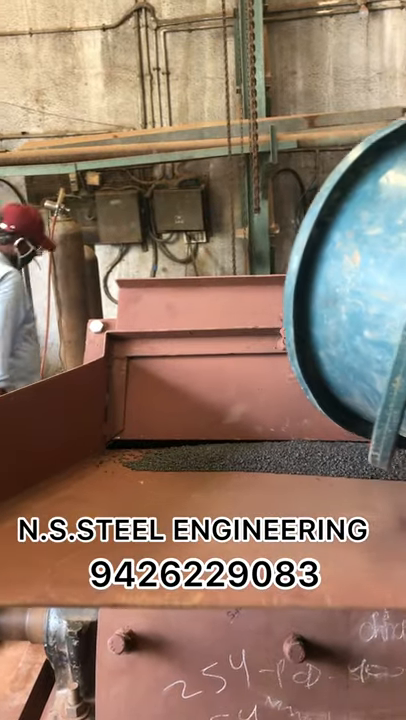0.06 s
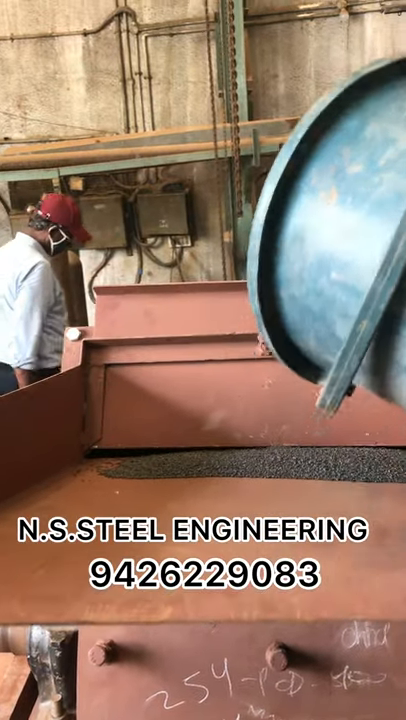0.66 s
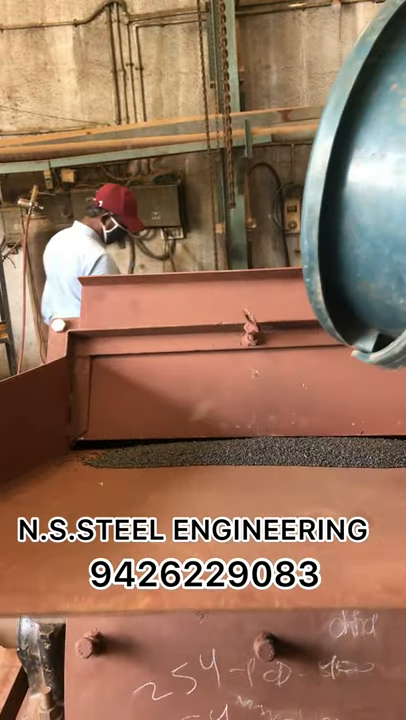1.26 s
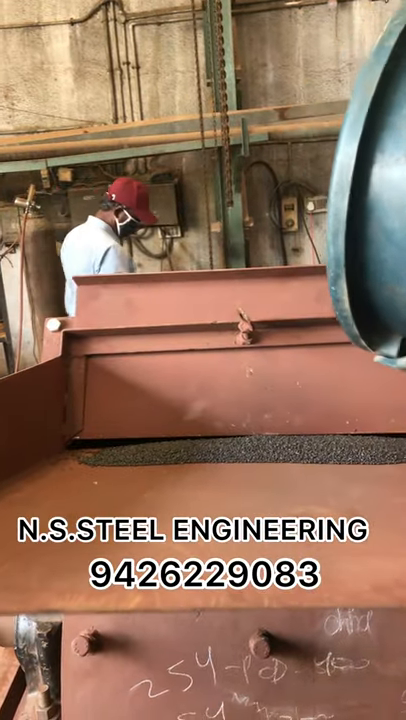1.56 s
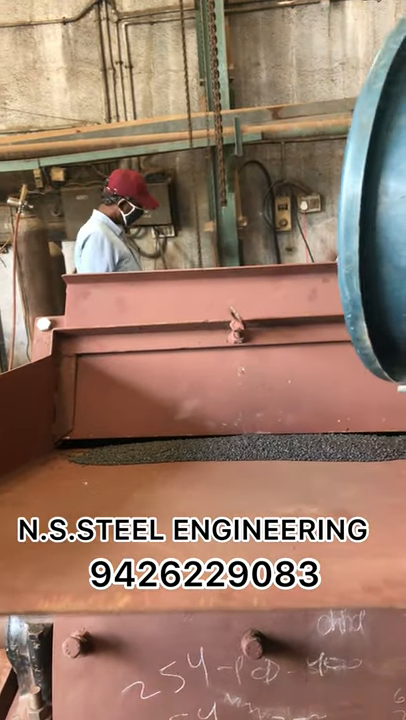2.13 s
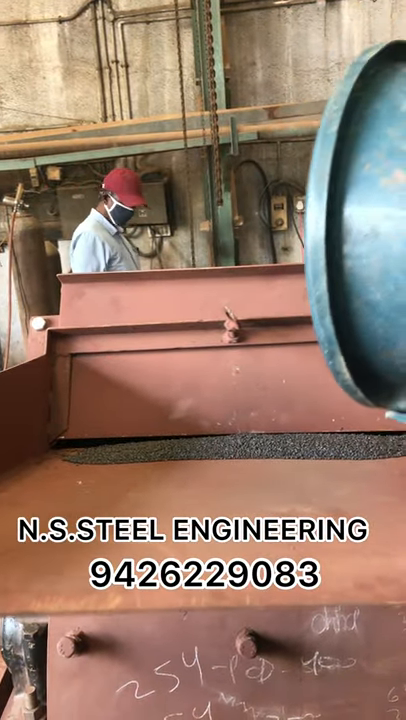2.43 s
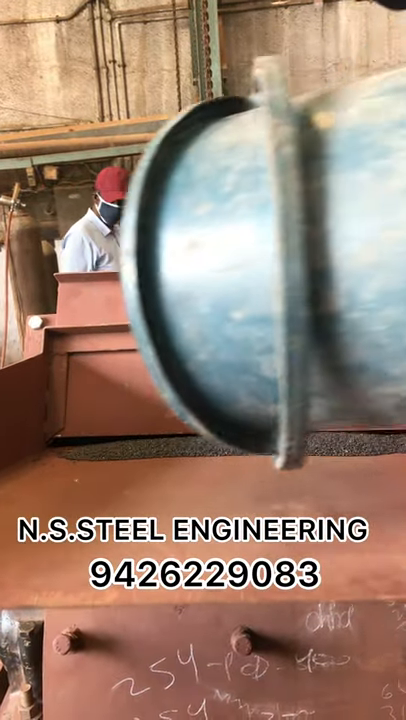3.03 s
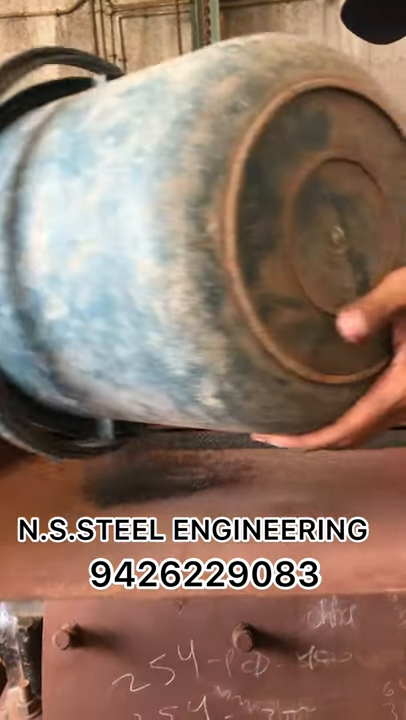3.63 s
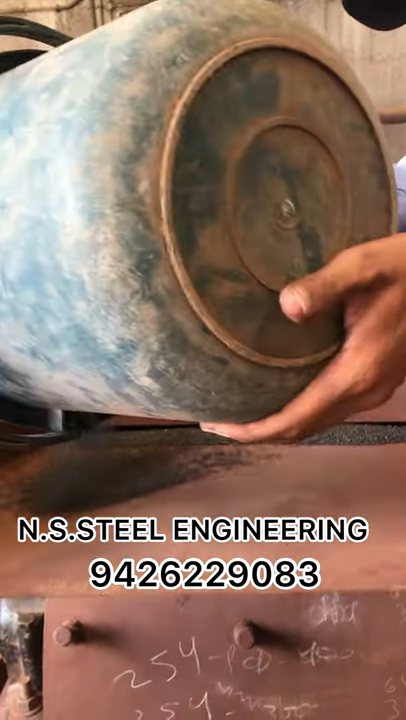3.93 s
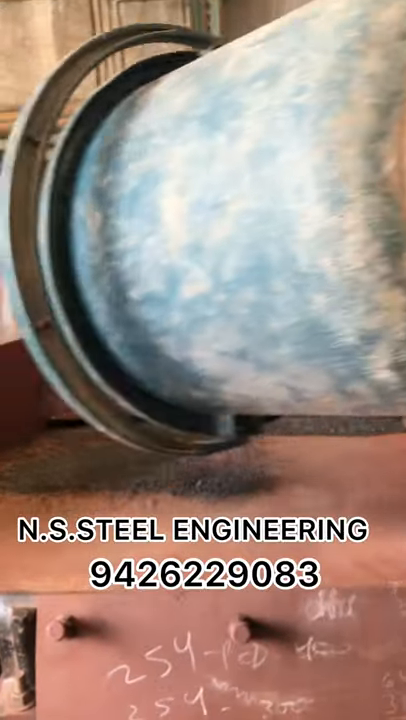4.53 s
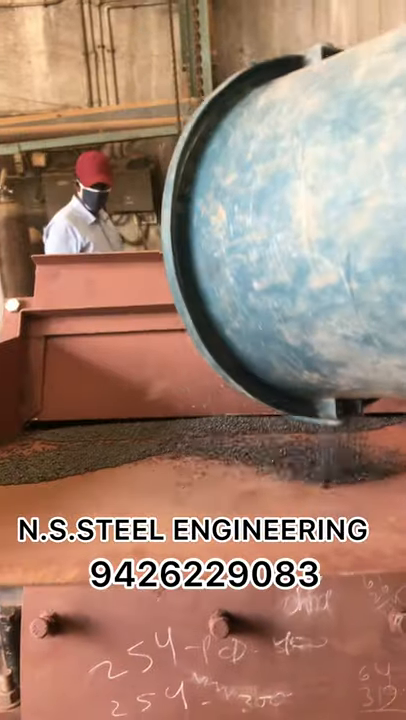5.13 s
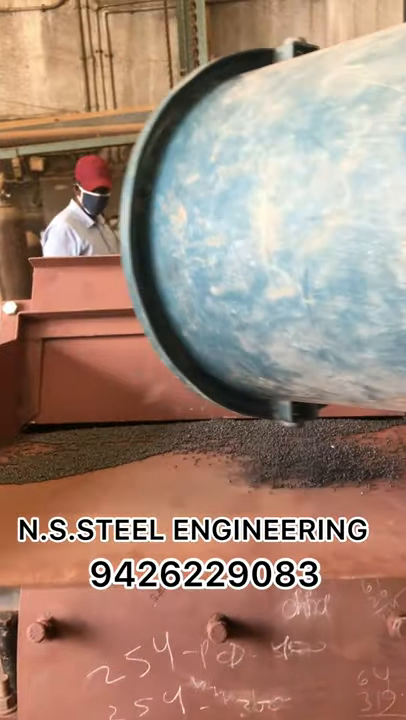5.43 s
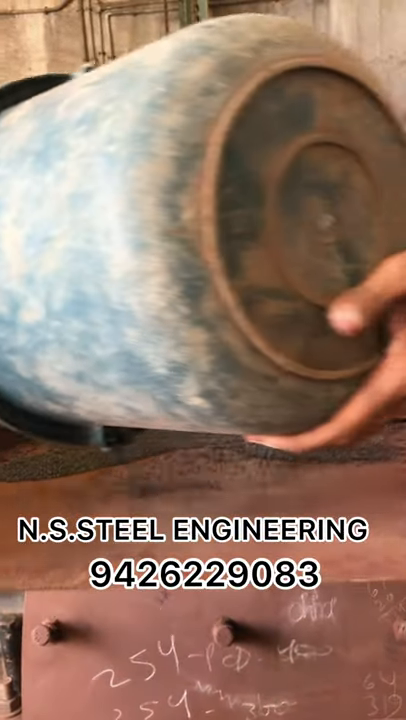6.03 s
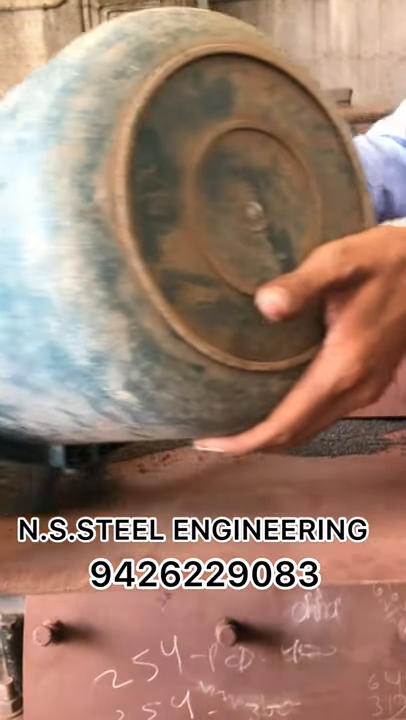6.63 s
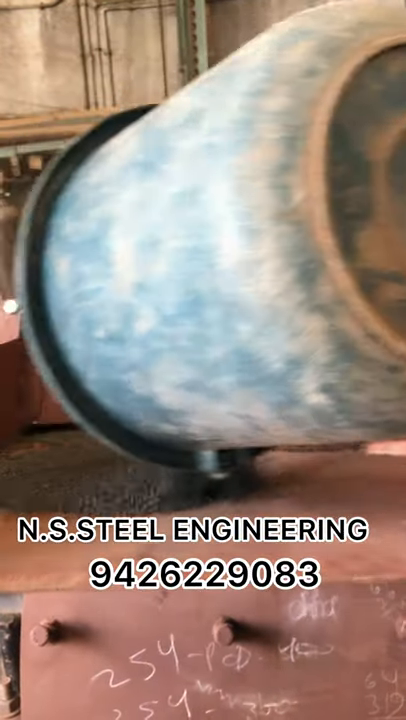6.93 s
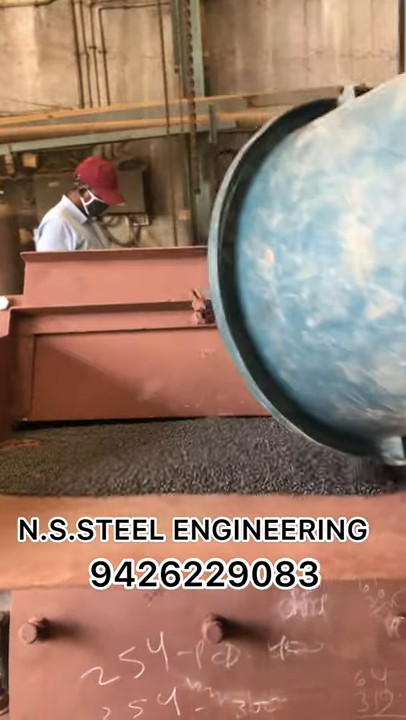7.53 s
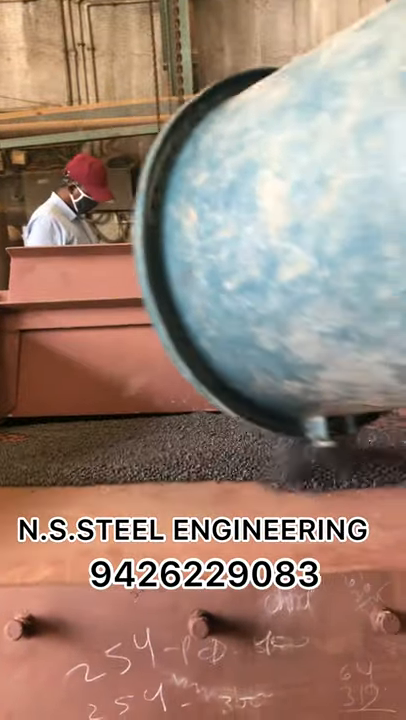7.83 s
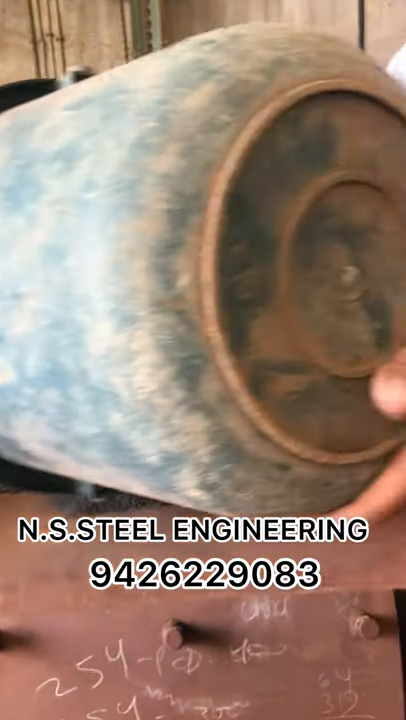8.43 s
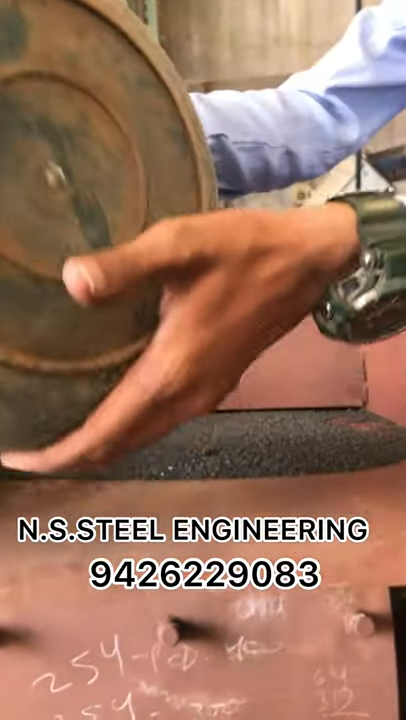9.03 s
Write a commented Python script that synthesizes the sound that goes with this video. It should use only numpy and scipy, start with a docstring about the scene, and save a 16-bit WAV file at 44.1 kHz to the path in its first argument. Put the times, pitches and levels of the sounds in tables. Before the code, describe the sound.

A crushing machine runs steadily in a workshop shed, with a loud hum, a thin high whine and a rush of churned air. After about three seconds, grit is shaken from a bucket onto the steel feed tray in several slides, adding a brighter hiss, fine patter and a few sharp ticks. The whine softens as the bucket comes in front of the fixed microphone.

```python
"""Hammer crusher in a workshop shed

A bucket of grit is shaken out over the feed tray of a running crusher. The hammers chop the air six
times a turn into a loud hum and a thin whine; the frame drones, churned air roars, and grit hisses
and ticks on the steel. The bucket swings in front of the microphone, screening the whine and shifting
the standing waves of the hum. The machine sits dead centre, the same in both channels."""
import sys
import numpy as np
from scipy import signal
from scipy.fft import rfft, irfft, next_fast_len
from scipy.io import wavfile

SR = 44100
rng = np.random.default_rng(int(sys.argv[2]) if len(sys.argv) > 2 else 0)


def master(y):
    """Save y as 16-bit WAV."""
    cut = np.clip(np.atleast_2d(y).T, -1, 1)
    pcm = np.round(cut * 32767)  # scale
    wavfile.write(sys.argv[1], SR, pcm.astype(np.int16))


N = 408807
TIME = np.arange(N) / SR
HAMMERS = 6

# weak drones of motor, belts and frame: f/Hz, relative level/dB
FRAME_DRONES = [(49.7, -64), (52.7, -70), (62.5, -55), (87.3, -55), (99.6, -54), (107.6, -52.5),
                (125, -54.5), (134.8, -47), (144.6, -56), (162.2, -52), (175, -47), (196, -60),
                (216.6, -53), (249.8, -47), (266, -66), (308.5, -46.5), (367, -53.5), (382.6, -52.5)]
# air churned in the casing: f/Hz, relative density/(dB per Hz)
AIR_SPECTRUM = [(28, -97), (36, -90), (44, -73), (80, -69.5), (135, -61.5), (175, -66.5), (235, -55.5),
                (310, -63), (410, -65), (490, -65), (620, -62), (850, -64.5), (1090, -67), (1450, -71),
                (2200, -78.5), (5000, -100)]
# grit scouring the steel: f/Hz, relative density/(dB per Hz)
GRIT_SPECTRUM = [(900, -91.5), (1600, -69), (1870, -64.5), (2250, -69), (3000, -68), (3650, -66),
                 (4850, -66), (5400, -64.5), (6300, -64.5), (7100, -65.5), (7600, -69), (8600, -66.5),
                 (10000, -68), (10500, -69.4), (11500, -64.5), (15700, -69.5)]
# resonances of the steel casing: f/Hz, width/Hz, lift/dB
CASING_MODES = [(525, 13, 1), (1065, 76, 4), (1310, 43, 6), (2110, 80, 1), (2910, 100, 4), (3635, 45, 2),
                (5180, 27, 2.5), (5520, 78, 1.5), (6110, 97, 4.5), (11800, 400, 0.5)]
# single grains and clumps striking steel: t/s, level/dB, centre f/Hz, decay/ms
GRIT_STRIKES = [(1.018, -18, 5200, 2), (5.327, -23, 11000, 7), (6.283, -25, 8000, 12),
                (6.318, -24, 11000, 9.7), (6.535, -24, 10000, 10), (7.257, -23, 12500, 10),
                (8.4386, -10.5, 15000, 0.8), (8.4513, -18, 6500, 1.5)]
# slides of grit out of the bucket: t/s, length/s, flow/(0-1)
GRIT_SLIDES = [(3.35, 1.5, 1), (4.853, 1.5, .62), (6.146, 0.93, 0.7), (8.854, .5, .8)]
# shoves of the bucket across the tray and back: t/s, length/s, reach/(0-1)
BUCKET_SHOVES = [(3.4, 1.27, 0.46), (5.7, 1.55, 0.55), (7.92, 1.85, 0.96)]
# tones locked to the rotor: order/(cycles a turn), relative level/dB
ROTOR_ORDERS = [(1, -48.5), (2, -47), (3, -42), (4, -51), (5, -40.5), (6, -15.5), (7, -35.5), (8, -48),
                (9, -46.5), (10, -55.5), (12, -30.5), (14, -61), (15, -45), (16, -49), (18, -22.2),
                (20, -59), (21, -46.5), (24, -32), (26, -50), (27, -46.5), (28, -54), (30, -26), (33, -46),
                (34, -55), (36, -41.5), (39, -55.5), (42, -49), (48, -44), (51, -50), (54, -46), (60, -53),
                (63, -54.5), (66, -53.5), (126, -56), (132, -44.5), (135, -53), (138, -39), (144, -62)]
# change at the microphone, a row for each hammer harmonic from the first up:
# bucket aside/dB, at full reach/dB, rim passing/dB
STANDING_WAVES = [(-0.3, 0, -0.5), (-5, -1, -1), (1.2, -1, -.2), (-1, -8, -9.5), (-1.3, -4, 1),
                  (3.5, 0, -4)]


def gain_of(db):
    """Decibels to amplitude."""
    return 10 ** (np.asarray(db) / 20)


def unit_rms(x):
    """Scales to rms 1."""
    return x / np.sqrt(np.mean(x ** 2) + 1e-20)


def coloured(white, spectrum):
    """Gives a white signal of rms 1 a spectrum in dB per Hz."""
    size = next_fast_len(N)
    hz, db = np.transpose(spectrum)
    bin_hz = np.fft.rfftfreq(size, 1 / SR)
    shape = gain_of(np.interp(np.log(bin_hz + 1), np.log(hz), db))
    return irfft(rfft(white, size) * shape, size)[:N] * np.sqrt(SR / 2)


def wander(rate_hz, size=4096):
    """Random drift of rms 1, with little motion above the rate."""
    hz = np.fft.rfftfreq(size, N / SR / size)
    slow = irfft(rfft(rng.standard_normal(size)) / (1 + (hz / rate_hz) ** 2))
    return np.interp(TIME, np.linspace(0, N / SR, size), unit_rms(slow))


def shed_tone(cycles, db, waver, waver_hz):
    """A sine wavering in level and phase, as the shed's echoes make it at the microphone."""
    angle = 2 * np.pi * (cycles + rng.random())
    in_phase = (1 + waver * wander(waver_hz)) * np.cos(angle)
    quadrature = waver * wander(waver_hz) * np.sin(angle)
    return np.sqrt(2) * gain_of(db) * (in_phase + quadrature)


def bucket_position(arrive_s=3.7):
    """How far the bucket is off to the side, and how far shoved over the tray (both 0-1)."""
    aside = np.maximum(1 - TIME / arrive_s, 0)
    reach = sum(far * np.sin(np.pi * np.clip((TIME - start) / length, 0, 1))
                for start, length, far in BUCKET_SHOVES)
    return aside, reach


def grit_flow(rise_s=0.25, fade_s=0.31):
    """Each slide out of the bucket builds up, runs and trickles out."""
    flow = np.zeros(N)
    for start, length, strength in GRIT_SLIDES:
        age = np.maximum(TIME - start, 0)
        flow += strength * (1 - np.exp(-age / rise_s)) * np.exp(-np.maximum(age - length, 0) / fade_s)
    return flow


def frame_drone(trim_db=-1.0):
    """Motor, belts and frame drone in the background and beat against the hum."""
    return sum(shed_tone(hz * TIME, db + trim_db, waver=0.27, waver_hz=0.8) for hz, db in FRAME_DRONES)


def air_roar(flow, trim_db=-0.7, flow_db=1.4):
    """Air churned in the casing roars, a little louder while grit runs."""
    return coloured(rng.standard_normal(N), AIR_SPECTRUM) * gain_of(trim_db + flow_db * flow)


def grit_hiss(turns, aside, flow, split_hz=7700, trim_db=-1.36, flutter_db=0.47):
    """Grit scours the casing, louder with the flow, pulsing faintly with each hammer and each turn."""
    hiss = coloured(rng.standard_normal(N), GRIT_SPECTRUM)
    low = signal.sosfiltfilt(signal.butter(3, split_hz, fs=SR, output="sos"), hiss)
    coarse = low * gain_of(0.36 * flow + 0.6 * aside)
    fine = (hiss - low) * gain_of(0.62 + 0.7 * flow)
    pulsing = 1 + 0.017 * np.cos(2 * np.pi * HAMMERS * turns) + 0.022 * np.cos(2 * np.pi * turns)
    return (coarse + fine) * pulsing * gain_of(trim_db + flutter_db * wander(rate_hz=17))


def grit_patter(flow, grains_per_s=1500, spread_db=2.5, skid_s=0.00077, trim_db=-12):
    """Poured grains land on the tray and skid for a moment, most small and a few large."""
    lands = rng.random(N) < flow * grains_per_s / SR
    sizes = gain_of(spread_db * np.minimum(rng.exponential(1, N), 4))
    power = np.convolve((lands * sizes) ** 2, np.exp(-TIME[:400] / skid_s))[:N]
    patter = unit_rms(np.sqrt(power) * rng.standard_normal(N))
    return gain_of(trim_db) * coloured(patter, GRIT_SPECTRUM)


def grit_ticks(width_octaves=0.48, size=4096):
    """Short bright bursts where a large grain or a clump hits steel."""
    out = np.zeros(N + size)
    hz = np.fft.rfftfreq(size, 1 / SR)
    for start, db, centre_hz, decay_ms in GRIT_STRIKES:
        band = np.exp(-0.5 * (np.log2((hz + 1) / centre_hz) / width_octaves) ** 2)
        burst = unit_rms(irfft(rfft(rng.standard_normal(size)) * band))
        fade = np.exp(-TIME[:size] * 1000 / decay_ms)
        out[round(start * SR):][:size] += gain_of(db) * burst * fade
    return out[:N]


def steel_casing(noise, ripple_db=1.37, ripple_step_hz=45, steps=2048):
    """The casing colours the noise: a few strong modes, and a fine ripple from its many weak ones."""
    size = next_fast_len(N)
    hz = np.fft.rfftfreq(size, 1 / SR)
    strong_db = sum(db / (1 + (2 * (hz - centre) / width) ** 2) for centre, width, db in CASING_MODES)
    weak_db = ripple_db * np.interp(hz, np.arange(steps) * ripple_step_hz, rng.standard_normal(steps))
    return irfft(rfft(noise, size) * gain_of(strong_db + weak_db), size)[:N]


def rotor_turns(free_hz=37.587, loaded_hz=37.492, sag_s=4.4):
    """Turns made so far, as the rotor sags from its free speed towards its loaded speed."""
    speed = loaded_hz + (free_hz - loaded_hz) * np.exp(-TIME / sag_s)
    return np.cumsum(speed) / SR


def hammer_tones(turns, aside, reach, rim_at_s=3.15, rim_width_s=0.29):
    """Hammer passes make the hum; unequal hammers add other orders, the high ones a buzz and a whine."""
    rim = np.exp(-((TIME - rim_at_s) / rim_width_s) ** 2)  # the rim swings past the microphone, briefly dipping some harmonics
    standing_db = np.array(STANDING_WAVES) @ np.array([aside, reach, rim])
    screen_db = 9 * aside - 2 * reach  # the treble drops as the bucket comes in front
    out = np.zeros(N)
    for order, db in ROTOR_ORDERS:
        order = round(order)
        cycles = order * turns
        harmonic, between = divmod(order, HAMMERS)
        if not between and harmonic <= len(standing_db):  # hum
            waver = 0.014 * harmonic ** 0.33  # shorter waves are disturbed more across the shed
            out += shed_tone(cycles, db + standing_db[harmonic - 1], waver, waver_hz=7.1)
        elif order > 100:  # whine
            out += shed_tone(cycles, db - 5.2 + screen_db, waver=0.14, waver_hz=3.7)
        elif harmonic > len(standing_db):  # buzz
            out += shed_tone(cycles, db - 1.8 + 0.3 * screen_db, waver=0.32, waver_hz=2.2)
        else:  # side tones around the hum's harmonics
            out += shed_tone(cycles, db - 1.0, waver=0.32, waver_hz=1.8)
    return out


def scene():
    """Crusher and bucket from one fixed microphone position in the shed."""
    turns = rotor_turns()
    aside, reach = bucket_position()
    flow = grit_flow()
    tones = hammer_tones(turns, aside, reach) + frame_drone()
    noise = air_roar(flow) + grit_hiss(turns, aside, flow) + grit_patter(flow)
    machine = tones + steel_casing(noise) + grit_ticks()
    return np.array([machine, machine])


def record(dry, edge_hz=15750):
    """The microphone chain cuts off steeply at the top of its band."""
    lowpass = signal.firwin(1023, edge_hz, window=("kaiser", 9), fs=SR)
    return signal.oaconvolve(dry, lowpass[None], "same")


dry = scene()
out = record(dry)
master(out)
```